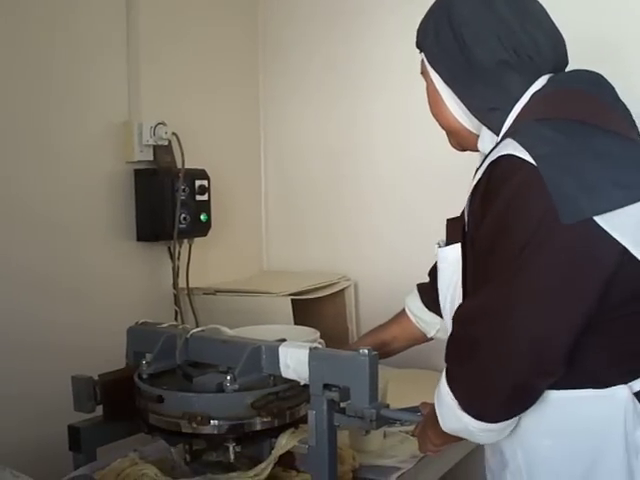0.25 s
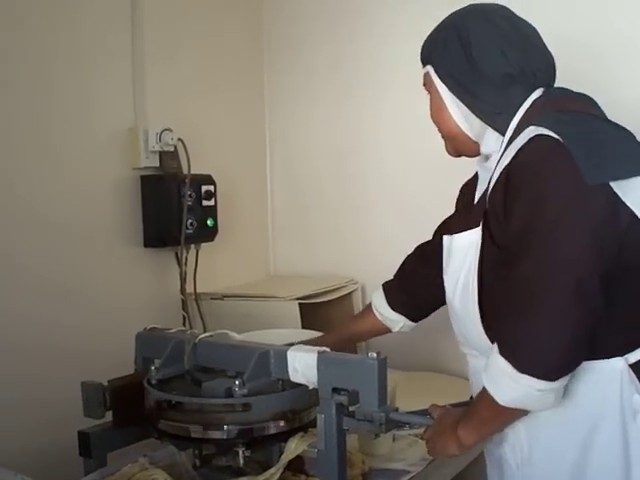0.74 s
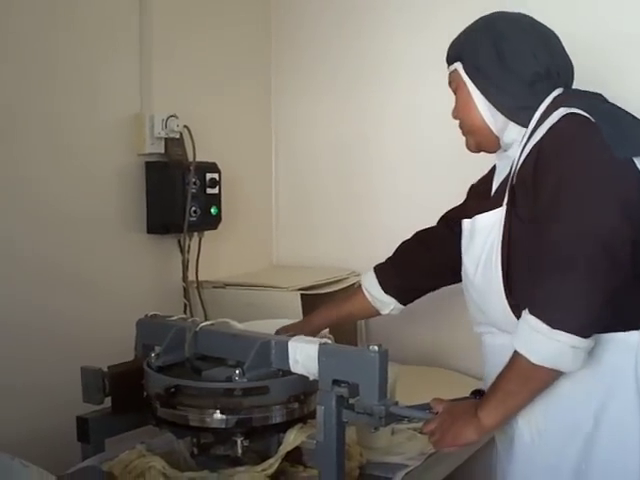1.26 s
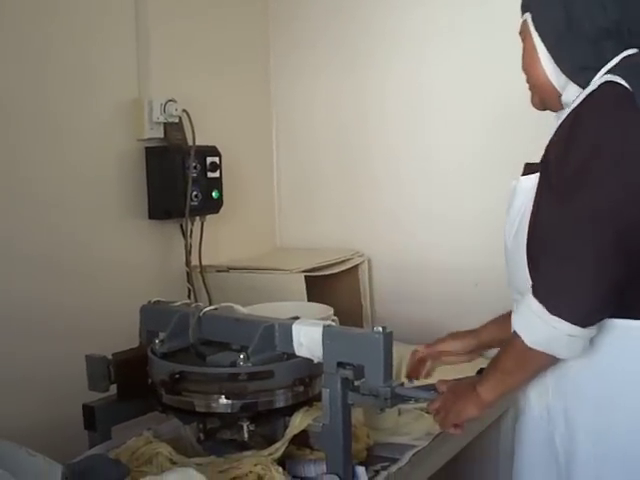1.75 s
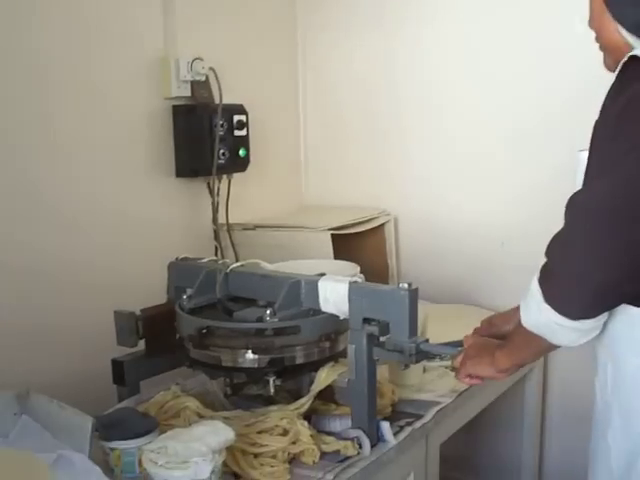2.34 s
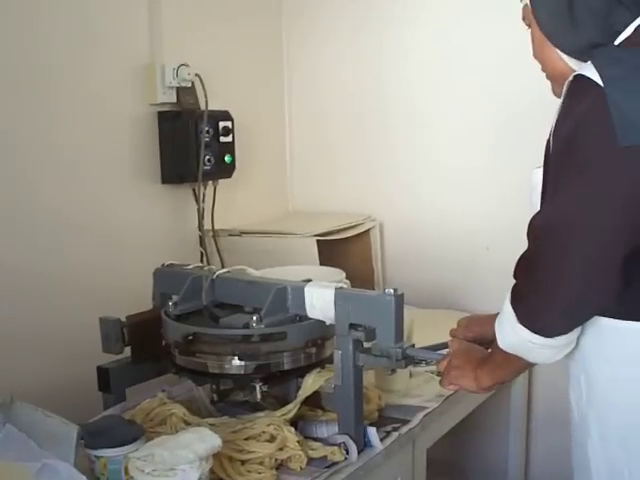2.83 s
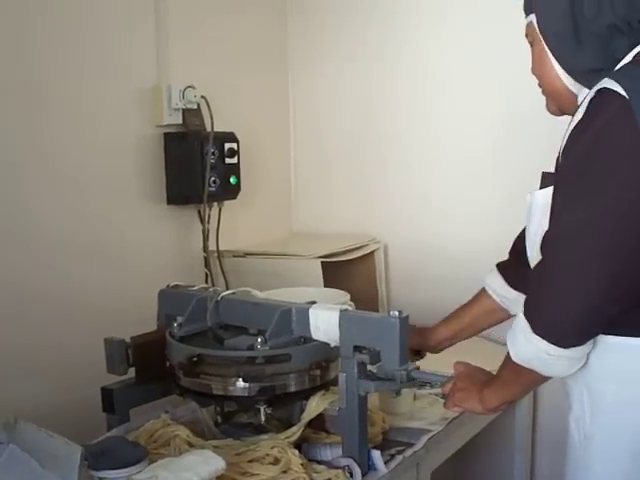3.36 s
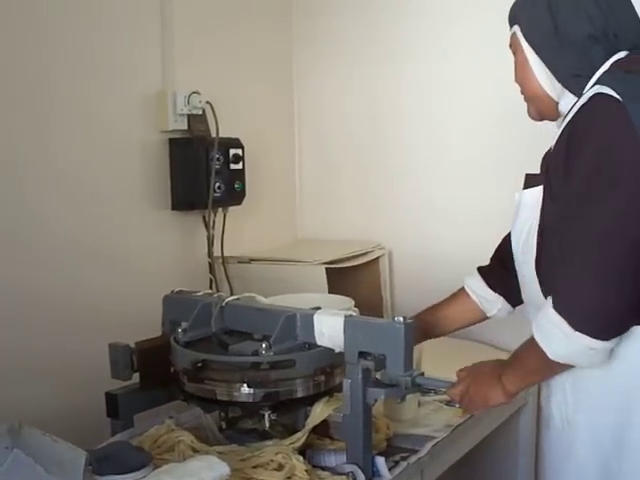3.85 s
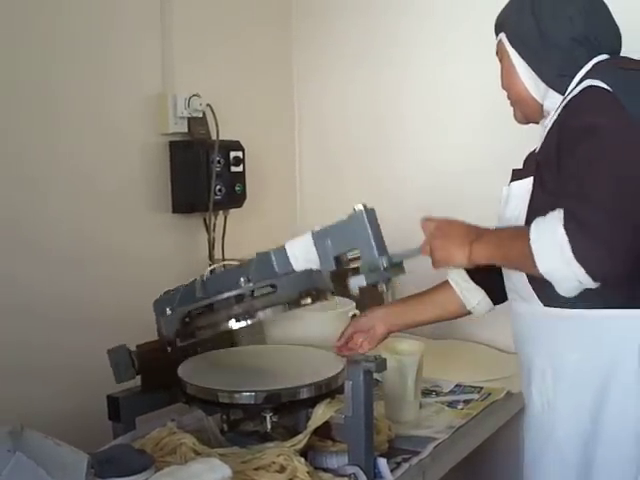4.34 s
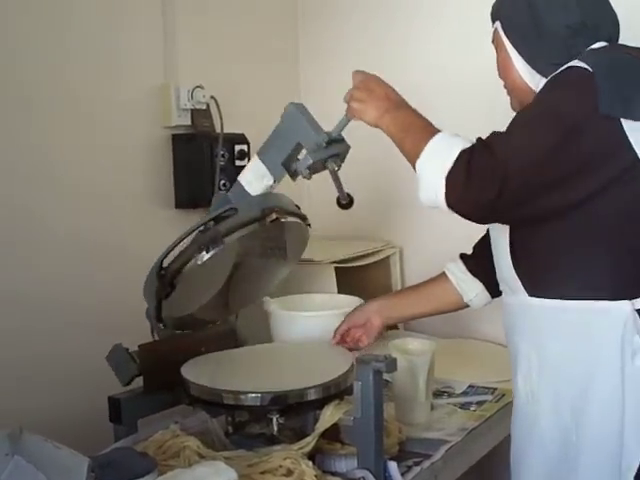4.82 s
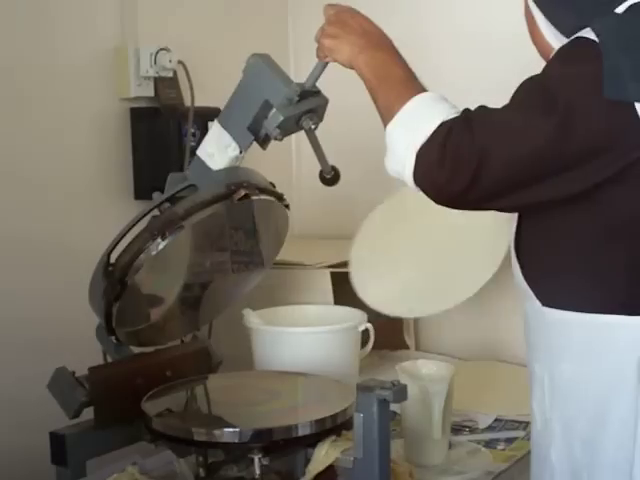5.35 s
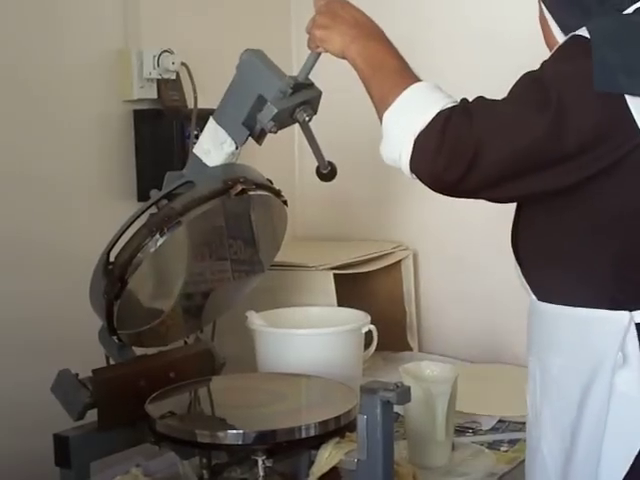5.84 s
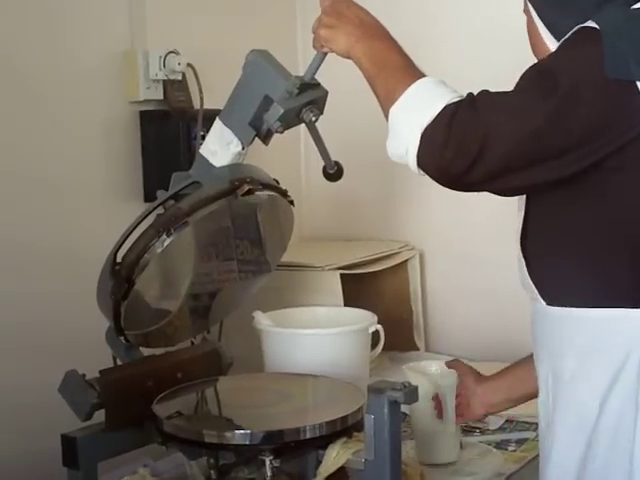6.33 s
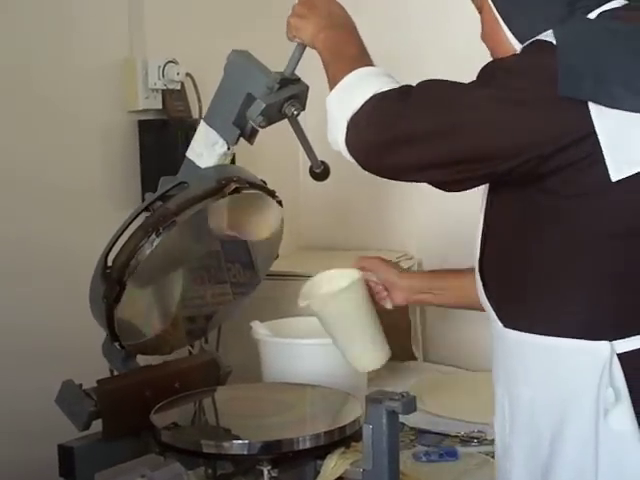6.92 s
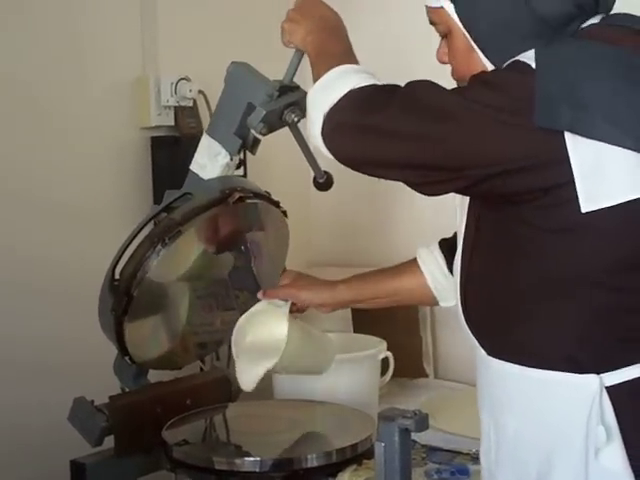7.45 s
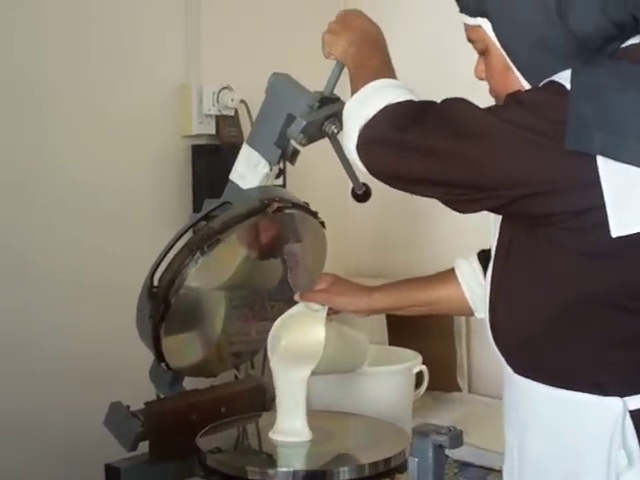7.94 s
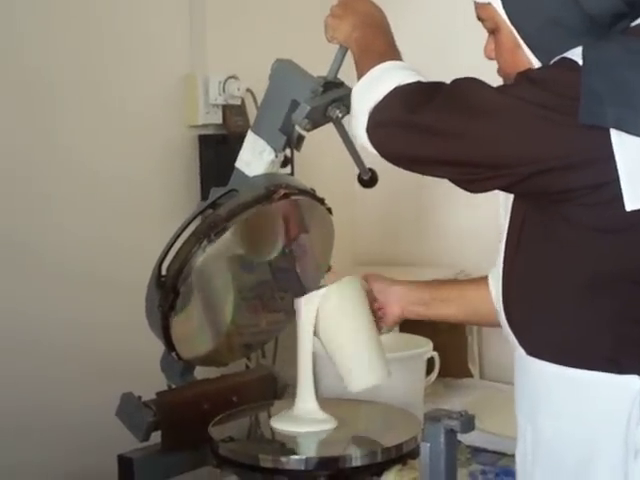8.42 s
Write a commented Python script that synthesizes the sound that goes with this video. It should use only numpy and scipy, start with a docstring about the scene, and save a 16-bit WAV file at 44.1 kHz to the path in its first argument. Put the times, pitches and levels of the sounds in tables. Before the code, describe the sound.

Mono, slightly dull close pickup in a small, briefly reverberant room with low hum and soft hiss. Dull thuds and a ringing steel clank press the lid down; clustered clanks and one sharp hard blow follow, with faint sputtering. The hinge then creaks open in stuttering slips and a thin squeak, cracks loudly while held open, and a loose lever snaps before small ticks and knocks.

```python
"""A low, wavering hum and a fine hiss of steam and recorder come first, with one dull slip of a hinge.
It is a wafer press in a bakery: its iron lid is pressed shut with groans, grinding and thuds, and clamped with
ringing clanks while batter sputters. The lid then swings up on a dry hinge that creaks in slips that quicken,
then grow slower, and cracks now and then while held open. Blows are dying sines plus fading noise; rubbing,
hiss and rumble are coloured noise or clicks. One narrow-band microphone hears it all."""
import sys
import numpy as np
from scipy import signal
from scipy.fft import rfft, irfft, next_fast_len
from scipy.io import wavfile

SR = 44100
rng = np.random.default_rng(int(sys.argv[2]) if len(sys.argv) > 2 else 0)


def pcm_store(signal):
    """Save signal as 16-bit PCM."""
    levels = np.round(np.clip(np.atleast_2d(signal), -1, 1) * 32767)
    wavfile.write(sys.argv[1], SR, levels.astype(np.int16).T)


N = 382788
TIME = np.arange(N) / SR  # seconds, whole scene
RING_TIME = np.arange(SR * 3 // 4) / SR  # seconds, one blow


def amp(db):
    """Turns decibels into a gain."""
    return 10 ** (np.asarray(db) / 20)


def unit(x):
    """Scales a sound to an rms of one."""
    return x / np.sqrt(np.mean(x ** 2) + 1e-20)


def unit_blow(x):
    """Scales a blow so that its first 40 ms have an rms of one."""
    return x / np.sqrt(np.mean(x[:SR // 25] ** 2) + 1e-20)


def read(points, hz):
    """Reads a table between its rows, along a log-frequency axis."""
    table_hz, value = np.transpose(points)
    return np.interp(np.log(hz + 1), np.log(table_hz + 1), value)


def level(curve):
    """Gives the gain at every sample from rows (time_s, level_db)."""
    return amp(np.interp(TIME, *np.transpose(curve)))


def add(mix, s, sound):
    """Adds a sound into the mix at time s."""
    part = mix[max(round(s * SR), 0):][:len(sound)]
    part += sound[:len(part)]


def coloured(x, colour):
    """Filters a sound by a table of frequency and level, then scales it to an rms of one."""
    size = next_fast_len(len(x))
    gain = amp(read(colour, np.fft.rfftfreq(size, 1 / SR)))
    return unit(irfft(rfft(x, size) * gain, size)[:len(x)])


def butter(x, hz, kind, order=2):
    """Keeps the lows or the highs with a causal filter."""
    return signal.sosfilt(signal.butter(order, min(hz, SR / 2 - 1), kind, fs=SR, output="sos"), x)


def drift(per_s):
    """Wanders by chance between per_s random points a second, with an rms of one."""
    knots = rng.standard_normal(4096)
    return unit(np.interp(TIME * per_s, np.arange(len(knots)), knots))


def resonate(x, hz, width):
    """Rings at a fixed or gliding frequency; a narrower width in Hz rings longer."""
    turn = np.exp(2j * np.pi * np.cumsum(hz * np.ones(len(x))) / SR)
    r = np.exp(-np.pi * width / SR)
    return unit((turn * signal.lfilter([1 - r], [1, -r], x / turn)).real)


def grains(per_s, spread_db):
    """Makes a random train of tiny clicks; a positive spread makes a few large, a negative one a few small."""
    size = amp(spread_db * np.minimum(rng.exponential(1, N), 4))
    return unit(size * rng.standard_normal(N) * (rng.random(N) < per_s / SR))


def swells(rows, attack_s, release_s):
    """Gain of strokes (start_s, length_s, level_db) that build up, hold and die away; the times are for 20 dB."""
    power = 0
    for s, length, db in rows:
        outside = np.maximum(s - TIME, 0) / attack_s + np.maximum(TIME - s - length, 0) / release_s
        power = power + amp(db - 20 * outside) ** 2
    return np.sqrt(power)


def ring(modes, length=1):
    """Rings an object as dying sines, each reaching the microphone at a phase of its own."""
    t = RING_TIME
    total = 0
    for hz, db, t60 in modes:
        fade = amp(db - 60 * t / (t60 * length))
        total = total + fade * np.sin(2 * np.pi * (hz * t + rng.random()))
    return unit_blow(total)


# how slowly the room fades, before each blow's length factor: pitch_hz, time to fall 60 dB [s]
ROOM_FADE = [(80, 0.51), (260, 0.42), (700, 0.44), (1800, 0.31), (4000, 0.22), (8000, 0.18)]


def wash(colour, length=1, hold=.02):
    """Dense modes and reflections: near walls hold the level briefly, then each band dies at the room's pace."""
    noise = coloured(rng.standard_normal(len(RING_TIME)), colour)
    hz, t, bands = signal.stft(noise, SR, nperseg=512)
    bands = bands * amp(-60 * np.maximum(t - hold, 0) / (length * read(ROOM_FADE, hz)[:, None]))
    return unit_blow(signal.istft(bands, SR, nperseg=512)[1][:len(noise)])


def crack(colour, t60):
    """Makes the direct sound of a contact: noise that rises in 1 ms and falls 60 dB in t60 seconds."""
    t = RING_TIME
    return coloured(rng.standard_normal(len(t)), colour) * amp(-60 * t / t60) * np.minimum(t * 1000, 1)


def onset(x, swell, bass_lag=.008):
    """Lets a blow build up, with time constants in seconds; the bass takes longer than the treble."""
    bass = butter(x, 370, "low", order=1)
    treble_rise = 1 - np.exp(-RING_TIME / swell)
    bass_rise = 1 - np.exp(-RING_TIME / (swell + bass_lag))
    return (x - bass) * treble_rise + bass * bass_rise


# bench rumble when weight is put on the press: start_s, length_s, level_db
RUMBLE_BOUTS = [(.8, 0.13, -41), (1.2, 0.28, -47), (2.2, 0.46, -43), (2.87, 0.38, -40), (3.78, .12, -40.5)]
# colour of the rumble: pitch_hz, level_db per Hz
RUMBLE_COLOUR = [(15, -2), (38, -14), (50, -15.5), (70, -3.5), (88, -5), (105, -17.5), (160, -15.5),
                 (400, -38)]
# level shared by hum and steady rumble, before hum_db and rumble_db: time_s, level_db
HUM_LEVEL = [(0, -49), (2, -52.5), (4.3, -48), (5.0, -50.5), (5.5, -45), (6.6, -50), (7.6, -51),
             (8.68, -60.5)]
# colour of the room's air: pitch_hz, level_db per Hz
AIR_COLOUR = [(15, 7), (40, -12), (100, -4.5), (200, -2), (350, -6.5), (600, -9), (1500, -15.5),
              (4000, -21), (9000, -17.5)]
HUM_HZ, AIR_DB = 64.2, -51


def background(waver=0.3, throb_db=3, hum_db=-1.0, rumble_db=0.4):
    """A wavering sine hums in low noise; the noise swells under the work, over the steady air of the room."""
    tone = np.sin(2 * np.pi * HUM_HZ * TIME + waver * drift(7.1))  # waver in radians
    hum = unit(tone * amp(throb_db * np.tanh(drift(8.8))))
    rumble = coloured(rng.standard_normal(N), RUMBLE_COLOUR)
    bouts = swells(RUMBLE_BOUTS, attack_s=0.23, release_s=.25)
    shaking = np.hypot(amp(rumble_db) * level(HUM_LEVEL), bouts)
    air = amp(AIR_DB) * coloured(rng.standard_normal(N), AIR_COLOUR)
    return amp(hum_db) * level(HUM_LEVEL) * hum + shaking * rumble + air


# fine hiss of steam and recorder, before hiss_db and flutter: time_s, level_db
HISS_LEVEL = [(0.0, -49.5), (0.8, -48), (1.11, -44), (2.03, -49), (2.9, -44.5), (3.92, -44.5), (4.93, -48),
              (5.44, -43.5), (6.67, -47), (6.91, -44), (7.88, -50.5), (8.68, -52.5)]
# colour of the hiss: pitch_hz, level_db per Hz
HISS_COLOUR = [(500, -10), (1500, -10.5), (2200, -8.5), (3200, -3.5), (4200, -1.5), (5500, -0.5),
               (6800, 0.5), (9000, -3.5)]
# batter sputtering between the clamped plates: start_s, length_s, level_db
SPUTTER_BOUTS = [(2.45, 0.12, -52), (3.04, 0.063, -40), (3.25, 0.7, -48.5)]
# colour of the sputter: pitch_hz, level_db per Hz
SPUTTER_COLOUR = [(100, -3.5), (250, 10), (600, -1), (1200, -8), (1600, -15), (2500, -8), (5000, -11.5),
                  (8000, -23)]
# resonances of the plates: pitch_hz, width_hz, level_db
PLATE_RESONANCES = [(575, 24, -5.5), (978, 51, 0), (1177, 40, -6), (1270, 66, -4.5), (1760, 50, -6),
                    (1926, 50, -9.5)]


def hiss_and_sputter(hiss_db=6, flutter_db=.5, plates_db=-3, spit_db=1.0):
    """Steam and recorder hiss as fluttering noise; sputter is a train of clicks that rings the clamped plates."""
    hiss = coloured(rng.standard_normal(N), HISS_COLOUR) * amp(hiss_db + flutter_db * drift(25))
    spits = grains(per_s=5000, spread_db=-1.0) * amp(spit_db * drift(29.83))
    plates = unit(sum(amp(db) * resonate(spits, hz, width) for hz, width, db in PLATE_RESONANCES))
    sputter = unit(coloured(spits, SPUTTER_COLOUR) + amp(plates_db) * plates)
    return level(HISS_LEVEL) * hiss + swells(SPUTTER_BOUTS, attack_s=0.35, release_s=0.26) * sputter


# the swing: start, fastest moment and fully open [s]
SWING_S, FASTEST_S, OPEN_S = 4.452, 4.556, 5.13
# typical shortest wait, time away from the fastest moment that makes it e times longer [s], typical force
SLIP_GAP_S, SLOWING_S, CREAK_DB = .015, .15, -12


def creak(uneven=.22, uneven_db=3, count=10):
    """Lists slips (time_s, force_db) of the swinging lid: the slower it moves, the longer the hinge sticks."""
    s, slips = SWING_S, []
    for early, strong in rng.standard_normal((count, 2)):
        slips.append((s, CREAK_DB + uneven_db * strong))
        slowness = min(abs(s - FASTEST_S) / SLOWING_S, 2)
        s += SLIP_GAP_S * np.exp(slowness + uneven * early)
    return slips


DULL_HZ, SHARP_HZ = 600, 3600  # low-pass corner of a firm slip with the lid down and fully open
FAINT_DB, FIRM_DB = -20, -10  # slips weaker than firm release ever more softly


def release_hz(s, db):
    """A slip is sharper the wider the lid stands open, unless it is faint."""
    opened = np.clip((s - SWING_S) / (OPEN_S - SWING_S), 0, 1)
    firm = np.clip((db - FAINT_DB) / (FIRM_DB - FAINT_DB), 0, 1)
    return DULL_HZ * (SHARP_HZ / DULL_HZ) ** (firm * opened ** 2)


# single slips, one at the start, the rest as the lid slows and is held open: time_s, force_db
SINGLE_SLIPS = [(.002, -15.5), (4.687, -8.5), (4.727, -9.5), (4.782, -8.5), (4.881, -7.5), (5.034, -6),
                (5.258, -1.5), (5.601, 0), (6.705, -2), (6.893, -1), (6.999, -7), (7.157, -8), (8.255, -11),
                (8.594, -19.5)]
# notes of the lid and its arm: pitch_hz, level_db, time to fall 60 dB [s]
LID_MODES = [(134.6, -13.5, 0.16), (217, -8, 0.28), (236.9, 2, 0.34), (298.6, 0, 0.17), (336.4, -4.5, 0.28),
             (399, -18.5, .26), (456.5, -12, 0.26), (511, -17.5, 0.24), (553, -21, .3), (641, -12, 0.25),
             (694, -9, 0.34), (767, -16, 0.28), (792, -17, .3), (878, -25.5, 0.25), (886, -19.5, 0.23),
             (1014, -17, 0.31), (1057.5, -14, 0.27), (1088, -9, 0.24), (1703, -20, 0.25),
             (1805, -18.5, 0.24), (1770, -24, 0.19), (1994, -8.5, 0.17), (2115, -12.5, 0.11),
             (2100, -16.5, .26), (2146, -18, 0.31), (2224, -10.5, 0.29), (2400, -20, 0.16),
             (2390, -29, 0.31)]
# colour of the lid's many weaker notes: pitch_hz, level_db per Hz
LID_WASH = [(40, -13), (130, -1), (180, -8), (260, 7.5), (430, -4.5), (560, -7), (750, -1), (1100, -18.5),
            (1350, -12.5), (1800, -9), (2250, -7.5), (2800, -13), (4000, -14), (8000, -19)]
# colour of the instant of release: pitch_hz, level_db per Hz
SLIP_SNAP = [(200, -28), (900, -18), (1400, -9), (1750, -4.5), (2200, 7), (2500, -9), (3200, -10),
             (8000, -34)]


def hinge(level_db=-24, wash_db=-8, snap_db=-5, snap_t60=0.056, change=.35):
    """Every slip rings the same lid, its weak notes a little differently; faint slips release softly and dully."""
    modes, shared = ring(LID_MODES), wash(LID_WASH, length=1.0, hold=0.022)
    out = np.zeros(N)
    for s, db in SINGLE_SLIPS + creak():
        weak = unit_blow(shared + change * wash(LID_WASH, length=0.88, hold=0.016))
        lid = unit_blow(onset(modes + amp(wash_db) * weak, swell=0.0047, bass_lag=0.0063))
        snap = onset(crack(SLIP_SNAP, snap_t60), swell=0.0016)
        slip = lid + 2 * amp(snap_db) * snap  # snap_db is before the doubling
        add(out, s, amp(db) * butter(slip, release_hz(s, db), "low", order=3))
    return amp(level_db) * out


def squeal(hz, shake_db, jitter_hz):
    """Makes the unsteady tone of a rubbing joint: a sine whose pitch and loudness wander."""
    pitch = hz + jitter_hz * drift(120)
    return unit(np.sin(2 * np.pi * np.cumsum(pitch) / SR) * amp(shake_db * drift(60)))


# the arm groans as the lid is pressed home and the clamp is eased: start_s, length_s, pitch_hz, level_db
GROANS = [(0.38, 0.032, 302, -40.5), (0.517, 0.027, 147.7, -38), (0.58, .04, 219, -39),
          (3.857, 0.026, 86.6, -30.5), (3.865, .025, 965, -51)]
# the plates grind as the lid settles on the batter: start_s, length_s, level_db of the grinding with its echo
GRIND_STROKES = [(.42, 0.32, -40), (.88, 0.17, -41.5), (1.5, .04, -46.5)]
# colour of the grinding: pitch_hz, level_db per Hz
GRIND_COLOUR = [(40, -28.5), (100, -14.5), (140, 7.5), (180, -3), (230, -1), (310, 0), (380, -22),
                (520, -11.5), (750, -19.5), (1100, -19), (3000, -38.5)]
# dry rubbing in the arm's joints: start_s, length_s, level_db
RUB_STROKES = [(.5, 0.14, -44), (3.86, .02, -43), (4.565, 0.033, -39.5), (4.65, 0.49, -46)]
# colour of the rubbing: pitch_hz, level_db per Hz
RUB_COLOUR = [(250, -21), (500, 7.5), (900, -7.5), (1400, 0), (2200, -1), (3000, 0.5), (4200, -6.5),
              (7000, -13)]
# thin squeak of the hinge while the lid rises: time_s, pitch_hz
SQUEAK_PITCH = [(4.56, 2865), (4.62, 3090), (4.72, 2845), (4.84, 2760), (4.96, 2950), (5.12, 2820)]
# strands of the squeak: multiple of that pitch, level_db about which it wanders
SQUEAK_TONES = [(.518, -57), (.748, -61), (.873, -55.5), (1, -56)]


def friction(room_db=0, wander_db=3.0):
    """Grinding and rubbing are coloured click trains; groans and squeaks are unsteady sines."""
    slips = grains(per_s=1500, spread_db=1.0)
    echo = unit(signal.oaconvolve(slips, wash(GRIND_COLOUR, length=0.69, hold=0.018))[:N])
    grinding = unit(coloured(slips, GRIND_COLOUR) + amp(room_db) * echo)
    out = swells(GRIND_STROKES, attack_s=0.2, release_s=0.29) * grinding
    rubbing = coloured(grains(per_s=6000, spread_db=-1), RUB_COLOUR)
    out += swells(RUB_STROKES, attack_s=.07, release_s=0.091) * rubbing
    for s, length, hz, db in GROANS:
        out += swells([(s, length, db)], attack_s=0.079, release_s=.09) * squeal(hz, shake_db=2.5, jitter_hz=6)
    s, hz = np.transpose(SQUEAK_PITCH)
    pitch = np.interp(TIME, s, hz)
    squeak = np.zeros(N)
    for multiple, db in SQUEAK_TONES:
        strand = squeal(multiple * pitch, shake_db=4, jitter_hz=15.1)
        squeak += amp(db + wander_db * np.tanh(drift(14))) * strand
    fade = np.clip(np.minimum(TIME - s[0], s[-1] - TIME) / .02, 0, 1)  # 20 ms in and out
    return out + squeak * fade


def coloured_blow(x, bass_db, body_db, treble_db):
    """Where and how hard the frame is struck sets its bass, body and treble."""
    size = 2 * len(x)
    shelves = [(170, bass_db), (450, body_db), (1000, 0.012), (2800, treble_db)]  # pitch_hz, gain_db
    return irfft(rfft(x, size) * amp(read(shelves, np.fft.rfftfreq(size, 1 / SR))))[:len(x)]


# notes of the frame: pitch_hz, level_db, time to fall 60 dB before the length factor [s]
FRAME_MODES = [(74, -4, 0.31), (118.5, -12.5, 0.42), (228.6, -1, 0.21), (296, -1.5, 0.42),
               (396.7, -4.5, 0.17), (493.7, -6, 0.24), (557, -8.5, 0.22), (634, -12, 0.46),
               (786, -5.5, 0.14), (882, -11, 0.27), (957, -8.5, 0.28), (1100, -7, 0.21), (1356, -14, 0.27),
               (1770, -14, 0.29), (2260, -12.5, 0.23), (2650, -18, 0.18), (2960, -15, .22),
               (3317, -8.5, 0.09), (3835, -15.5, 0.21)]
# colour of the frame's dense ringing: pitch_hz, level_db per Hz
FRAME_WASH = [(30, -10), (80, -4.5), (250, 0.5), (600, -2.5), (1100, -7.5), (1500, -10), (2500, -9.5),
              (4000, -14), (6800, -20), (9000, -31)]
# colour of the instant of contact: pitch_hz, level_db per Hz
CRACK_COLOUR = [(100, -20), (400, -5), (1200, -1), (2500, -9), (4500, -11.5), (8000, -8)]


def strike(bass_db, body_db, treble_db, length, crack_db, note_hz, note_db,
           ring_db=1, note_t60=0.28, crack_t60=0.017):
    """Each blow cracks, rings the frame and favours one note; length stretches the ringing."""
    t = RING_TIME
    frame = unit_blow(wash(FRAME_WASH, length, hold=0.01) + amp(ring_db) * ring(FRAME_MODES, length))
    # note_db and crack_db are levels before the doubling here
    note = 2 * amp(note_db - 60 * t / (note_t60 * length)) * np.sin(2 * np.pi * note_hz * t)
    body = coloured_blow(frame, bass_db, body_db, treble_db)
    blow = onset(body + note, swell=0.0028, bass_lag=0.0042)
    return blow + 2 * amp(crack_db) * crack(CRACK_COLOUR, crack_t60)


# dull thuds of the heavy lid and of things on the bench: time_s, level_db, strongest note pitch_hz
THUDS = [(.512, -46, 138), (.654, -43, 215), (.826, -38.5, 300), (1.027, -38, 321), (1.162, -26, 481),
         (1.378, -45, 319), (1.474, -45, 299), (2.842, -36, 75), (3.524, -30, 233), (7.682, -54, 523),
         (8.228, -57, 477)]


def thuds(usual_db=-40, treble_db=-19, crack_db=-18, note_db=5, brighten=0.74, blur=0.14):
    """Soft, heavy contacts: a stronger thud is brighter and its one note stands out less."""
    out = np.zeros(N)
    for s, db, note_hz in THUDS:
        force = db - usual_db
        blow = strike(bass_db=7.0, body_db=-1.5, treble_db=treble_db + brighten * force, length=0.72,
                      crack_db=crack_db + brighten * force / 2, note_hz=note_hz,
                      note_db=note_db - blur * force)
        add(out, s, amp(db) * blow)
    return out


# hard blows of lever and clamp: time_s, level_db, weight_db, treble_db, strongest note pitch_hz,
# note level_db (before strike doubles its size)
CLANKS = [(.781, -38, 9, 5.5, 564, 7.5), (1.147, -25.5, 6, 6.5, 1076, -5.5),
          (2.772, -32.5, -2, 1.5, 980, -17), (2.797, -31.5, -0.5, 0, 1400, -11),
          (2.825, -26.5, -1.5, -1, 1165, -10.5), (3.511, -20.5, -10.5, -3, 162.5, -6),
          (3.918, -32, -2.5, 7, 700, -10)]


def clanks(bass_db=-1.5):
    """Steel meets steel with a sharp crack; the weight behind the blow gives it bass and body."""
    out = np.zeros(N)
    for s, db, weight_db, treble_db, note_hz, note_db in CLANKS:
        blow = strike(bass_db + weight_db, weight_db, treble_db, length=1.01, crack_db=-3.5,
                      note_hz=note_hz, note_db=note_db)
        add(out, s, amp(db) * blow)
    return out


# the latch drops into place: time_s, level_db
LATCH_DROPS = [(.784, -40.5), (1.466, -35.5)]
# colour of its rattle: pitch_hz, level_db per Hz
LATCH_COLOUR = [(200, -25), (900, -17), (1400, -13), (1900, -17), (2500, 0.5), (2950, -0.5), (3400, -10),
                (3850, -4), (4400, -17), (8000, -28)]


def latch(crack_db=-9):
    """A light steel catch: a bright patch of fading noise with a short crack."""
    out = np.zeros(N)
    for s, db in LATCH_DROPS:
        rattle = onset(wash(LATCH_COLOUR, length=0.91, hold=0.011), swell=0.0016)
        contact = 2 * amp(crack_db) * crack(LATCH_COLOUR, t60=.025)  # crack_db is before the doubling
        add(out, s, amp(db) * (rattle + contact))
    return out


# small dry ticks: time_s, level_db
TICKS = [(2.113, -44), (2.12, -62), (2.154, -41), (5.205, -44.5), (7.086, -35), (7.352, -46)]
# colour of the ticks: pitch_hz, level_db per Hz
TICK_COLOUR = [(100, -17), (500, -2), (850, -5), (1500, -5.5), (3000, -4.5), (4500, -4), (7000, -11)]


def ticks(t60=0.019, room_db=-25):
    """Short clicks of noise that barely wake the room."""
    out = np.zeros(N)
    for s, db in TICKS:
        room = wash(TICK_COLOUR, length=0.46, hold=.005)
        add(out, s, amp(db) * unit_blow(crack(TICK_COLOUR, t60) + amp(room_db) * room))
    return out


# notes of the loose steel lever: pitch_hz, level_db, time to fall 60 dB [s]
STEEL_MODES = [(2086, -9, .2), (2065, -5, 0.18), (2730, -7, 0.15), (2825, -13.5, 0.17), (2950, -13, .18),
               (5100, 3, 0.058), (5530, -7, 0.13), (6250, -3, 0.11)]
# colour of its dense ringing: pitch_hz, level_db per Hz
STEEL_WASH = [(100, 0.5), (450, -21.5), (700, 4.5), (1100, -3), (1400, -21), (2100, -13), (2900, 6),
              (3500, -2), (5000, 2.5), (6800, 4.5), (9000, -2.5)]
CLACK_S, CLACK_DB = 6.893, -20


def clack(ring_db=-3):
    """The loose lever snaps over, steel on steel: a hard, bright snap with the short ring of a rod."""
    out = np.zeros(N)
    x = wash(STEEL_WASH, length=1.0, hold=0.0091) + amp(ring_db) * ring(STEEL_MODES)
    add(out, CLACK_S, amp(CLACK_DB) * unit_blow(onset(x, swell=0.0019, bass_lag=0.0043)))
    return out


# light knocks while the jug is handled: time_s, level_db, strongest note pitch_hz
KNOCKS = [(7.246, -36.5, 553), (8.403, -36.5, 656)]


def knocks():
    """Light, hard contacts: almost no bass, since there is no weight behind them."""
    out = np.zeros(N)
    for s, db, note_hz in KNOCKS:
        blow = strike(bass_db=-39, body_db=-2, treble_db=0.7, length=0.97, crack_db=2.0,
                      note_hz=note_hz, note_db=-12.5)
        add(out, s, amp(db) * blow)
    return out


def scene():
    """Adds all sources at one microphone, the same in both channels."""
    mono = background() + hiss_and_sputter() + hinge() + friction() + thuds()
    mono += clanks() + latch() + ticks() + clack() + knocks()
    return np.array([mono, mono])


MIC_EDGE_HZ, CUT_HZ = 7400, 9000


def record(dry, leak_db=-27):
    """The microphone's band ends steeply; a faint shelf leaks past it up to the final cut-off."""
    band = signal.oaconvolve(dry, signal.firwin(161, MIC_EDGE_HZ, fs=SR)[None], "same")
    heard = band + amp(leak_db) * (dry - band)
    cut = signal.firwin(511, CUT_HZ, window=("kaiser", 9), fs=SR)
    return signal.oaconvolve(heard, cut[None], "same")


dry = scene()
out = record(dry)
pcm_store(out)
```